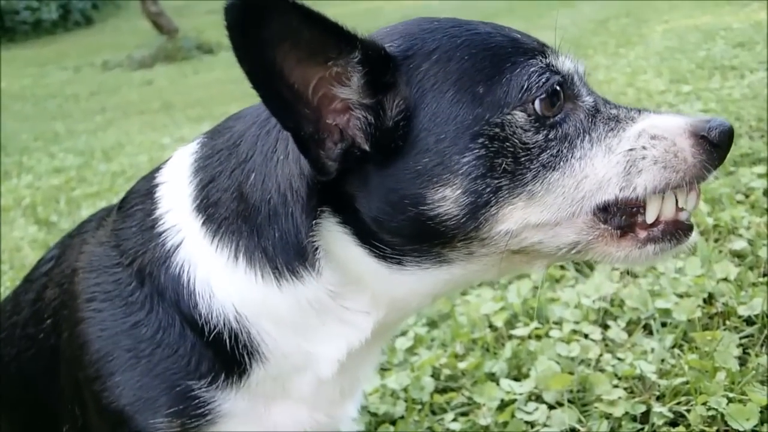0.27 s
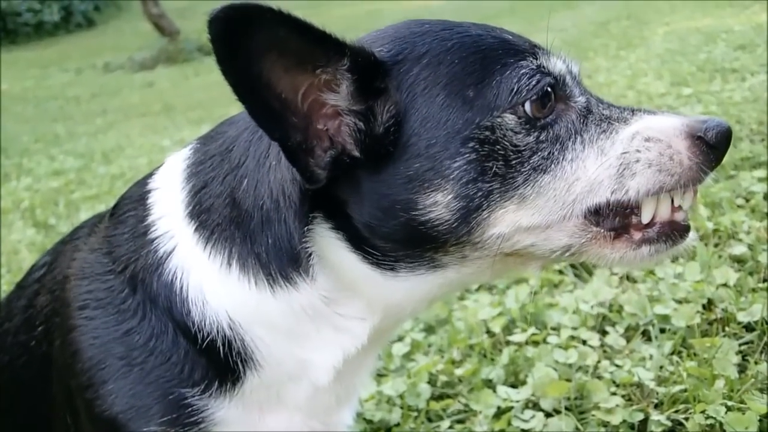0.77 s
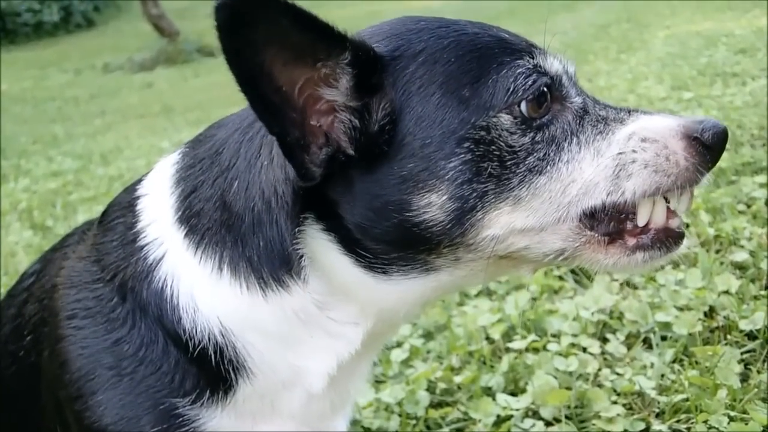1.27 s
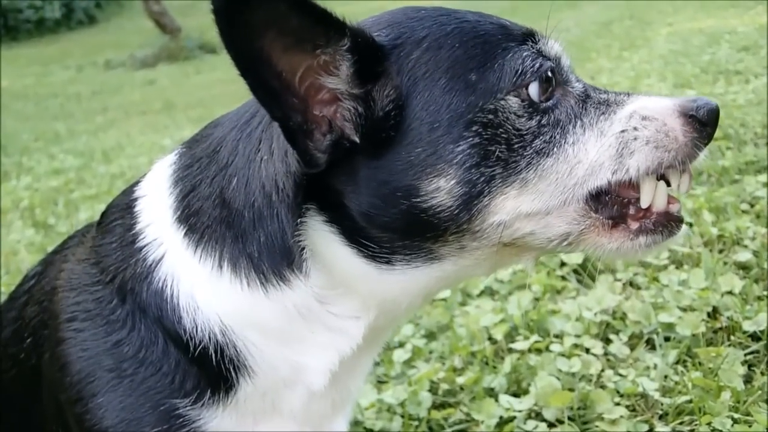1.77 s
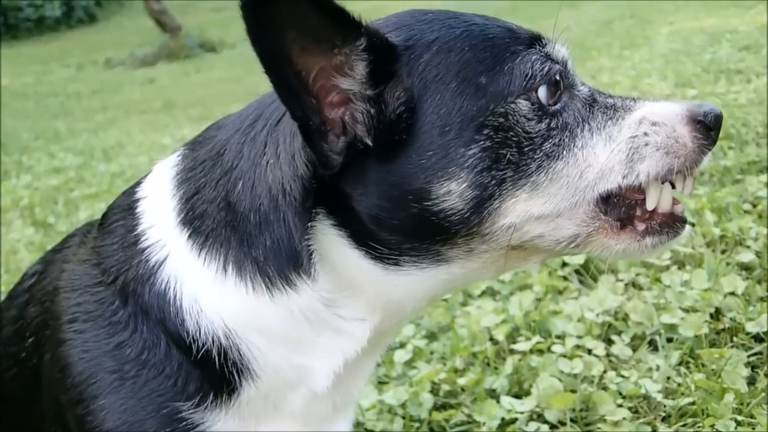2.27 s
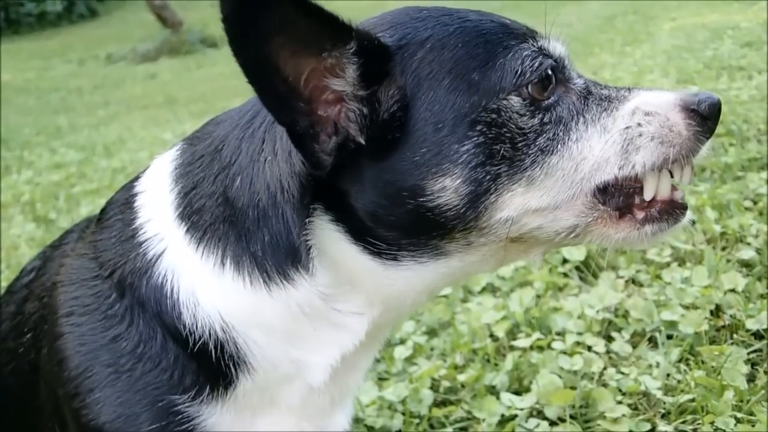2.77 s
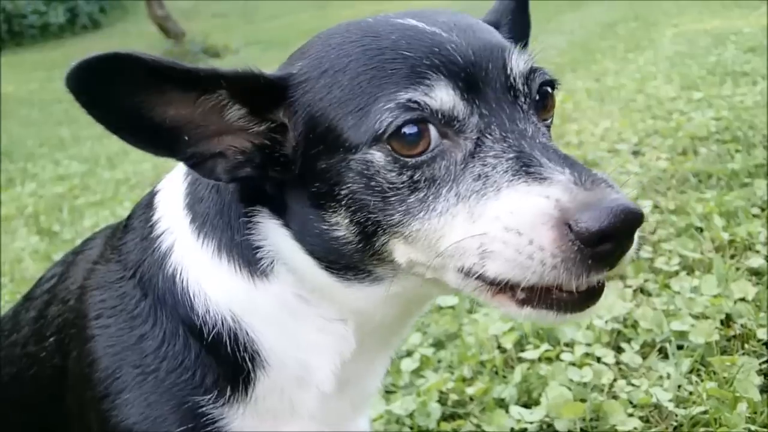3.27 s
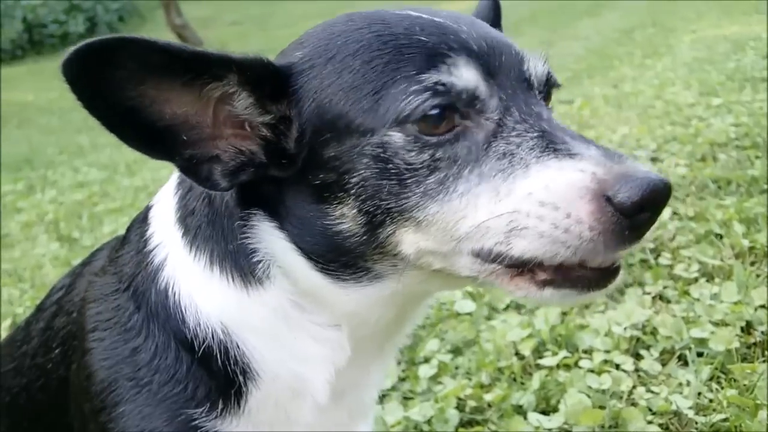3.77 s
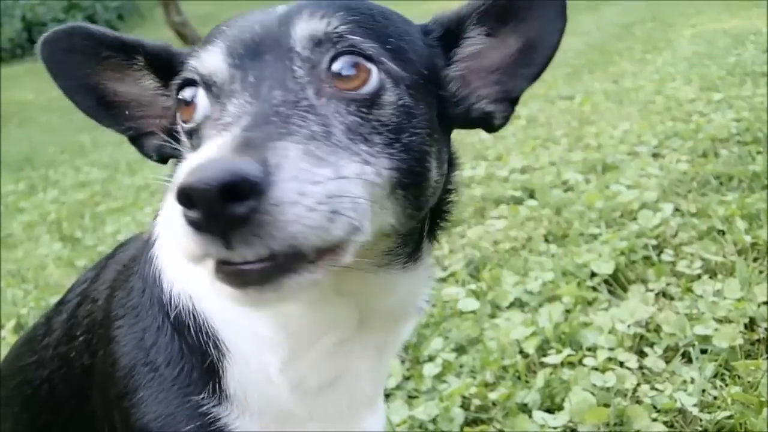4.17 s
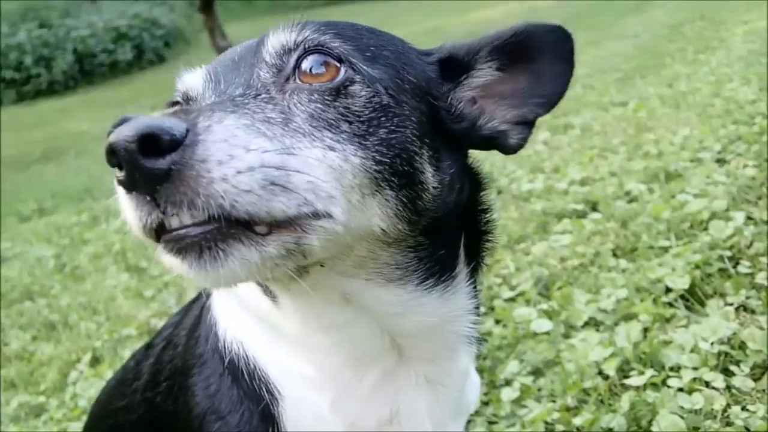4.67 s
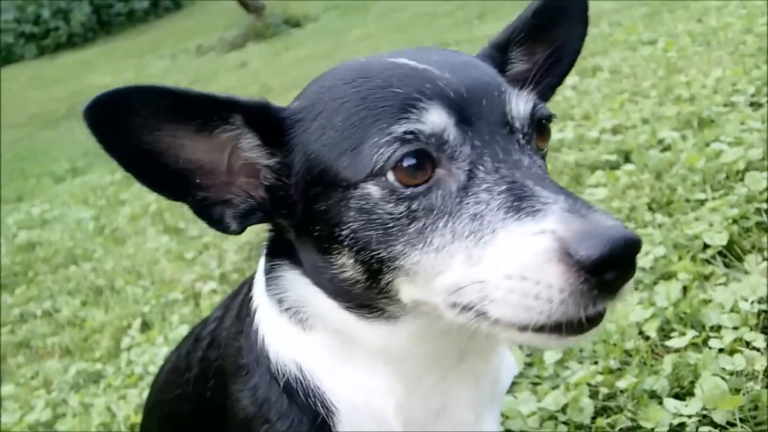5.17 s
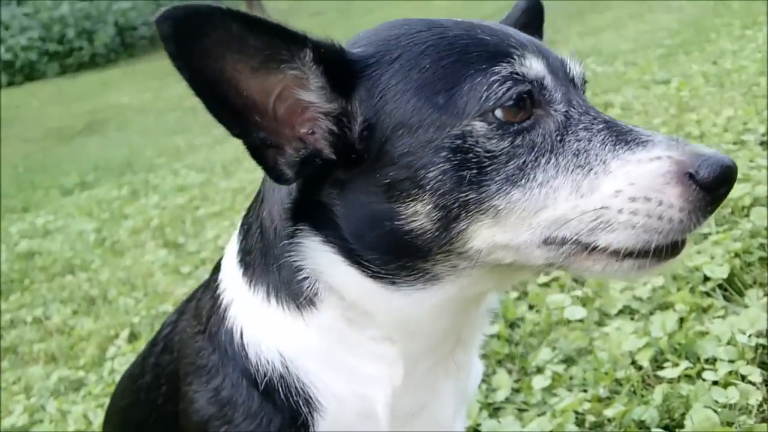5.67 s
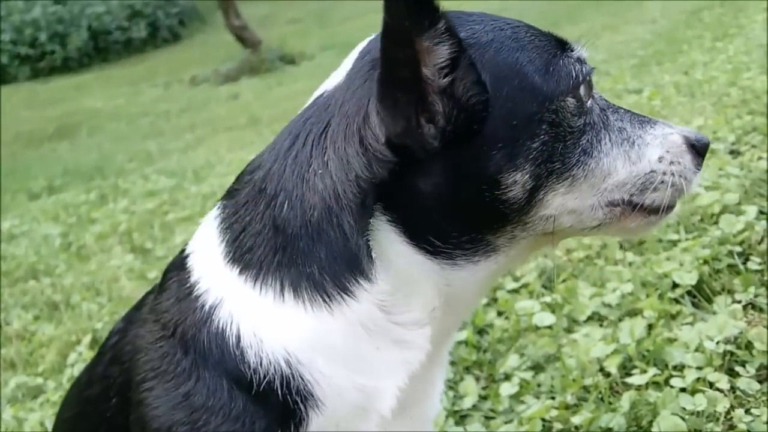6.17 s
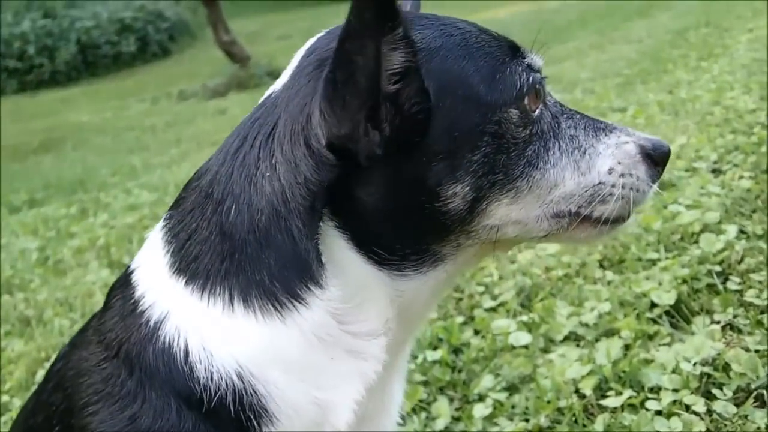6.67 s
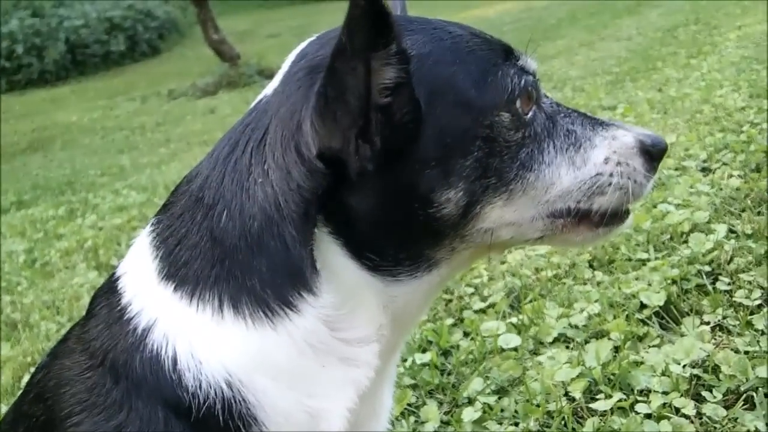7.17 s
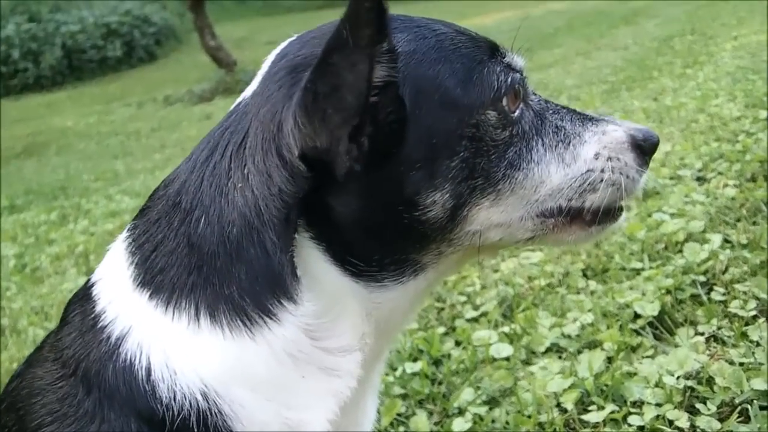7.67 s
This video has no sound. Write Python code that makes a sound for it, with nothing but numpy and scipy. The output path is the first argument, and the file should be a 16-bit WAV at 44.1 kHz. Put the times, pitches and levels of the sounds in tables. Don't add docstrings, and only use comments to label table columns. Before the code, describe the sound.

Close to a stereo microphone outdoors, a small dog bursts into a choking, raspy growl lasting about two seconds, pauses, then growls again with less rasp. Its collar tags jingle brightly as the head turns, fur and grass rustle, and the tongue snaps once. After a short grunt comes a lower, quieter growl. Crickets chirp and trill throughout over soft evening air.

```python
import sys
import numpy as np
from scipy import signal
from scipy.fft import rfft, irfft, next_fast_len
from scipy.io import wavfile
from scipy.ndimage import uniform_filter1d

SR = 44100
rng = np.random.default_rng(int(sys.argv[2]) if len(sys.argv) > 2 else 0)


def digitize_waveform(pressure):
    field = np.atleast_2d(pressure).T
    bounded = np.clip(field, -1, 1)
    quanta = np.round(bounded * 32767).astype(np.int16)
    wavfile.write(sys.argv[1], SR, quanta)


def voltage_ratio(decibels):
    exponent = np.asarray(decibels, float) / 20
    return 10 ** exponent


N = 350154
TIME = np.arange(N) / SR

HUM_HZ, HUM_START_DB, HUM_END_DB = 129.6, -59, -50
# t/s, length/s, f/Hz, width/Hz, level/dB
BIRD_NOTES = [(3.99, .04, 2000, 1500, -43), (4.38, .05, 2400, 2000, -39), (4.795, .045, 1900, 1500, -44),
              (2.53, .05, 2000, 150, -46), (2.69, .05, 1520, 200, -39)]

# f/Hz, density/dB
AIR_SPECTRUM = [(15, -48), (25, -26), (137, 2), (317, -6), (591, -8), (1560, -16), (3430, -18.5),
                (3920, -23), (4610, -8), (5570, -2.5), (6050, -8.5), (7110, -6.5), (9070, -23.5),
                (13200, -19), (16000, -28)]
AIR_DB = -38
# f/Hz, correlation [-1 to 1]
AIR_LIKENESS = [(60, 0.99), (180, 0.65), (550, 0.16), (1650, 0.2), (4970, 0.58), (15000, -0.46)]
# middle t/s, length/s, fine hiss level/dB, low body level/dB
RUSTLES = [(0.35, 0.9, -61, -70), (1.45, 0.8, -64, -70), (2.123, 0.2, -66, -44), (2.45, 2.5, -57, -51.5),
           (2.902, 0.91, -45.5, -43), (3.683, 1.36, -46, -41.5), (4.525, 0.42, -47, -39),
           (4.7, 4.1, -46, -56.5), (5.9, 1.1, -70, -78), (7.827, 0.92, -46, -57)]

# t/s, level/dB
NEAR_CHIRPS = [(.8, -38), (1.231, -35), (2.106, -37), (2.6, -38), (3.09, -39), (3.534, -38), (4.03, -37),
               (4.49, -42), (4.837, -43), (5.346, -37), (5.795, -36.5), (6.285, -35.5), (6.737, -36),
               (7.196, -36), (7.64, -39)]
SECOND_CHIRPS = [.02, .425, .83, 1.235, 1.64, 2.14, 2.455, 2.9, 3.3, 3.68, 4.07, 4.48, 4.885, 5.285, 5.695,
                 6.098, 6.535, 6.95, 7.33, 7.74]
SECOND_DB = -43
# first stroke t/s, length/s, rate/strokes per s, level/dB, f/Hz
TRILL_PHRASES = [
    (0.0193, 1.7, 41.52, -51, 7270),
    (2.354, 3.97, 41.41, -47, 7290),
    (6.8, 1.13, 41.25, -48.5, 7040),
]
TRILL_RISE_S, TRILL_FALL_S, TRILL_JITTER_S = 0.17, 0.08, 0.0009
# t/s, level/dB
TRILLER_FACING = [(0, 0), (2.3, -6), (3.1, 3.5), (4.3, 0), (5.5, 2.5), (5.9, -2), (6.8, -3), (7.9, 6.5)]
# f/Hz, width/Hz, rate/strokes per s, depth [0-1], level/dB
FAR_TRILLERS = [(4727, 174, 17, 0.32, -51.5), (5190, 1200, 16, 0, -50.5), (5577, 280, 94, 0.8, -51.5),
                (6320, 130, 38, 1, -57), (6800, 170, 74, 1, -58.5)]

# t/s, ring level/dB, buckle knock level/dB, knock f/Hz
TAG_STRIKES = [(3.7444, -24.5, -42, 4815), (3.772, -33, -39, 4800), (3.8245, -32, -37, 5213),
               (3.85, -44, -35, 5540), (3.8541, -39, -24, 5290), (4.1508, -34, -48, 6000),
               (4.167, -21, -35, 6070), (4.2235, -16, -28.5, 4650), (4.2308, -30, -28, 4840),
               (4.235, -14, -29, 6200), (4.2375, -13, -28, 6300), (4.2437, -25, -24.5, 6200),
               (4.251, -21, -28, 5600), (4.2565, -28, -37.5, 3200), (4.6004, -26, -27, 4820),
               (4.6073, -36, -30, 4970), (4.6152, -30, -31, 5200), (4.6185, -33, -29, 6400),
               (4.982, -23, -35, 5030), (5.064, -35, -32.5, 5200), (5.08, -33, -38, 5200),
               (5.1597, -31, -40, 4960), (5.4007, -37, -34, 5000), (5.8215, -39, -41, 5000),
               (6.2335, -32, -39, 5000), (6.319, -24.5, -41, 6100), (6.574, -36, -36, 4760),
               (6.59, -29, -33, 5200), (6.992, -31, -40, 4800), (7.309, -34, -47, 5000),
               (7.7066, -28, -37, 5510), (7.7377, -27, -28, 4720), (7.7447, -17, -25.5, 4950),
               (7.7613, -26, -27.5, 5570), (7.765, -29, -26, 6010)]
# f/Hz, level/dB, t60/s
TAG_MODES = [(11300, -9, .02), (12250, 1, .17), (12430, -7, .1), (13710, -8, .1), (14620, -2, .06),
             (14750, 5, .06)]
# f/Hz, width/Hz, level/dB
TAG_GLANCE = [(11200, 530, -6.5), (12240, 510, 7.5), (14800, 520, 6.5), (15200, 370, -16)]
# multiple of the knock pitch, width/Hz, level/dB
BUCKLE_MODES = [(.62, 700, -13.5), (1, 800, 5.5), (1.3, 1100, -11), (1.9, 3000, -11)]

# t/s, effort level/dB, f/Hz, mouth opening/dB
GROWL_STRETCHES = [
    [(0.097, -19.5, 110.1, 6.5), (0.13, -26.5, 110.8, 8), (0.33, -25.5, 105.2, 4), (0.72, -28, 110, -1),
     (1.17, -29, 102.8, 1.5), (1.45, -26.5, 109.2, -0.5), (1.7, -29.5, 103.9, 2), (2.03, -28, 92.9, 0.5)],
    [(2.69, -27.5, 100.2, 1.5), (2.97, -28, 103.3, -0.5), (3.03, -31.5, 109.3, -7)],
    [(3.0, -25, 111.4, -1), (3.09, -28.5, 113.8, 1.5), (3.3, -29, 106, 2), (3.63, -29, 102.4, 0),
     (3.71, -31, 97.7, 2.5), (3.887, -29.5, 93.7, 3.5), (3.96, -32, 77.6, 4)],
    [(6.085, -42.5, 72.4, -3), (6.18, -36.5, 70.1, 4), (6.29, -57, 69.6, -17)],
    [(6.44, -34, 66.6, -4), (6.48, -38, 71.3, -3), (6.52, -37, 79.6, -2), (6.565, -34.5, 83, 0),
     (6.62, -35.5, 74.3, 0), (6.69, -37, 70, -1)],
    [(6.655, -39, 76, -5), (6.73, -33.5, 82.6, -5), (6.79, -33, 80.2, -3), (6.87, -33, 87.4, 1),
     (7.1, -32.5, 87.76, 6), (7.31, -32, 88.34, 4), (7.56, -34, 85.6, 2), (7.74, -33.5, 80.7, 3),
     (7.92, -35.5, 76.4, -7)],
]
# t/s, roughness [0-1]
FOLD_ROUGHNESS = [
    [(0, .85), (.7, .72), (1, .55), (1.15, .65), (1.4, .5), (1.6, .65), (1.9, .55), (2.05, .3)],
    [(2.7, .7), (3, .65)],
    [(3, .6), (3.15, .42), (3.6, .42), (3.8, .15)],
    [(6, .6)],
    [(6.44, .5), (6.5, .22), (6.68, .35)],
    [(6.7, .3), (6.8, .62), (7.25, .58), (7.42, .08), (7.62, .1), (7.72, .2)],
]
# attack/s, release/s, then fundamental, mouth and breath level/dB against effort
STRETCH_VOICING = [
    (0.0085, 0.073, -11.5, -13, -17),
    (0.0082, 0.022, -9.5, -9, -17),
    (0.036, 0.035, -6.5, -11.5, -20),
    (0.016, 0.066, -13, -27, -37),
    (0.041, 0.037, -16, -23, -23.5),
    (0.03, 0.057, -15, -24, -29),
]
LOW_DB_PER_HZ = 0.5
# f/Hz, level/dB
CHEST_COLOURS = [
    [(76, -40.5), (130, 0), (146, 3), (209, -3), (253, -3.5), (307, -15.5), (420, -17), (517, -43.5),
     (640, -50.5), (830, -55), (1410, -120)],
    [(76, -20), (130, -0.5), (151, 2), (205, -2), (253, -3), (295, -13), (356, -11.5), (429, -19),
     (640, -32.5), (830, -72), (1410, -120)],
    [(70, -24), (120, -6), (175, 1), (260, -4), (360, -5), (440, -22), (520, -21), (640, -33.5), (830, -51),
     (1400, -100)],
]
# f/Hz, width/Hz, level/dB
MOUTH_BARED = [(698, 460, -9.5), (897, 153, 4.5), (990, 270, -5), (1184, 200, -7.5)]
# f/Hz, width/Hz, level/dB
MOUTH_HEAD_UP = [(713, 540, -9.5), (863, 143, 5), (970, 174, -4.5), (1154, 150, -9.5)]
# f/Hz, width/Hz, level/dB
MOUTH_CLOSED = [(724, 82, -3), (868, 200, 1), (1006, 240, -2.5), (1200, 190, -3.5)]
# f/Hz, width/Hz, level/dB
AIRWAY = [(1500, 190, -1.5), (2280, 720, -2.5), (2644, 310, 1), (3930, 2340, -2), (4895, 376, 11),
          (5550, 720, 6), (8760, 1700, -11.5)]
# f/Hz, width/Hz, level/dB
AIRWAY_HEAD_UP = [(1500, 240, 3.5), (2140, 460, 7), (2480, 580, 3.5), (3650, 880, -6.5), (4780, 710, 4),
                  (5650, 740, -0.5), (8000, 2200, -10)]
# t/s, level/dB
BREATH_LEAK = [(0.06, -14), (0.14, 10), (0.24, -1), (0.7, -1), (1.1, 0), (1.35, 2.5), (1.9, 2), (2.7, 0.5),
               (3.3, 1.5), (3.7, 2), (3.95, 0.5), (6.5, 5), (7.9, 3.5)]
# t/s, peak level/dB, brightness/dB, chest share
FOLD_SLAPS = [(0.055, -33, -19, 0.48), (0.070, -26.5, -4, 0.9), (0.0817, -23, -2, 0.73),
              (0.101, -26, 5, 0.69), (0.1279, -19, -0.5, 0.62), (0.135, -23.5, -5, 0.32),
              (0.167, -16, -4, 0.32), (0.176, -21, -8, .3), (0.202, -22, -8, 0.31), (0.2319, -27, 4, 0.39),
              (.251, -30, -6, 0.55), (.263, -24, -8, 0.43), (.297, -25, -8, .4), (.343, -29, -8, .4),
              (0.36, -20.5, -14, 0.31), (.413, -29, -8, 0.33), (.603, -27, -10, .4),
              (0.745, -32, -16, 0.36), (1.333, -27, -1, 0.65), (1.497, -28, -6, 0.64),
              (2.698, -36, 4, 0.47), (2.721, -21.5, 0, 0.5)]
# t/s, peak
# level/dB
NOISE_PUFFS = [(0.1096, -37), (0.169, -35), (0.199, -36), (0.246, -35), (0.2858, -32), (0.336, -33.5),
               (0.379, -34.5), (0.43, -33.5), (0.4763, -33.5), (0.519, -34), (0.56, -35), (0.6553, -36),
               (1.3414, -37.5), (2.794, -31.5), (2.831, -33.5), (2.884, -35.5), (2.929, -36.5),
               (2.968, -37.5), (3.838, -37.5), (4.2555, -43)]
PUFF_HZ, PUFF_SPREAD_HZ = 3200, 200
# t/s, peak level/dB, f/Hz, length/s
WET_CLICKS = [(2.318, -39, 1500, 0.019), (2.339, -37, 990, 0.011), (2.533, -41, 2830, 0.013),
              (4.646, -44.5, 800, 0.012), (6.37, -46, 1900, 0.013), (7.102, -43, 2520, 0.012),
              (7.915, -47.5, 2516, 0.028)]
SNAP_S, SNAP_DB, SNAP_T60_S = 4.7447, -23, 0.014
# f/Hz, width/Hz, level/dB
SNAP_HOLLOW = [(740, 340, 8), (2310, 2000, -1), (5150, 1100, 8)]

LEFT_DB = -2.15
LEFT_LAG = 1
# f/Hz, width/Hz, share
NARROW_DIPS = [(4020, 680, 1.0), (6100, 160, .6)]


def evened(x):
    return x / np.sqrt(np.mean(x ** 2) + 1e-20)


def read(points, hz):
    f, value = np.transpose(points)
    return np.interp(np.log(hz + 1), np.log(f + 1), value)


def follow(points, t):
    return np.interp(t, *np.transpose(points))


def add(mix, s, sound):
    part = mix[round(s * SR):][:len(sound)]
    part += sound[:len(part)]


def fade(t, length, attack, release):
    ramp = np.minimum(t / attack, (length - t) / release)
    return np.sin(np.pi / 2 * np.clip(ramp, 0, 1)) ** 2


def wander(length, seconds):
    size = max(int(seconds * SR), 1)
    once = uniform_filter1d(rng.standard_normal(length), size)
    return evened(uniform_filter1d(once, size))


def resonate(x, hz, width):
    r = np.exp(-np.pi * width / SR)
    pole = r * np.exp(2j * np.pi * hz / SR)
    return 2 * signal.lfilter([(1 - r) ** 2], [1, -2 * pole, pole ** 2], x).real


def band_noise(hz, width):
    return evened(resonate(rng.standard_normal(N), hz, width))


def tract(x, modes):
    out = 0
    for k, (hz, width, db) in enumerate(modes):
        out = out + (-1) ** k * voltage_ratio(db) * resonate(x, hz, width)
    return evened(out)


def coloured(x, points):
    size = 8192
    db = read(points, abs(np.fft.fftfreq(size, 1 / SR)))
    log_gain = np.log(voltage_ratio(np.maximum(db, -70)))
    taps = np.fft.ifft(np.exp(np.conj(signal.hilbert(log_gain)))).real
    return signal.oaconvolve(x, taps[:size // 2])[:len(x)]


def burst(seconds, hz, width):
    size = int(seconds * SR)
    return evened(resonate(rng.standard_normal(size), hz, width)) * np.hanning(size) / 2


def far():
    turns = np.cumsum(HUM_HZ + 2.0 * wander(N, 0.094)) / SR
    hum_db = np.linspace(HUM_START_DB, HUM_END_DB, N) + 1.1 * wander(N, 0.13)
    out = voltage_ratio(hum_db) * np.sin(2 * np.pi * turns)
    for s, seconds, hz, width, db in BIRD_NOTES:
        add(out, s, voltage_ratio(db) * burst(seconds, hz, width))
    gusts = voltage_ratio(-62.5 + 2.2 * wander(N, 0.14))
    return out + gusts * np.array([band_noise(84, 65) for _ in range(2)])


def air():
    frames, hz = N // 256 + 5, np.fft.rfftfreq(1024, 1 / SR)
    a, b, c, d, patches = rng.standard_normal((frames, 513, 5)).T
    patches = evened(uniform_filter1d(uniform_filter1d(patches, 10, 0), 12, 1))
    t = np.arange(frames) * 256 / SR
    still = voltage_ratio(read(AIR_SPECTRUM, hz))
    still = voltage_ratio(AIR_DB) * still / np.linalg.norm(still)
    power = still[:, None] ** 2

    fine = np.exp(-((hz - 12500) / 3000) ** 2 / 2)
    body = 1 / (1 + ((hz - 800) / 1800) ** 2) * (hz > 250)
    s, length, *levels_db = np.transpose(RUSTLES)
    moves = fade(t[:, None] - s + length / 2, length, length / 2, length / 2) ** 2
    for shape, db in zip((fine, body), levels_db):
        power = power + np.outer(shape ** 2 / np.sum(shape ** 2), moves @ voltage_ratio(db) ** 2)

    same = np.clip(read(AIR_LIKENESS, hz), -1, 1)[:, None]
    left = a + 1j * b
    right = same * left + np.sqrt(1 - same ** 2) * (c + 1j * d)
    z = np.array([left, right]) * np.sqrt(power) * voltage_ratio(2.24 * patches)
    return 0.57 * signal.istft(z, nperseg=1024, noverlap=768)[1][:, :N]


def stroke(hz, seconds, fall):
    t = np.arange(int(seconds * SR)) / SR
    return np.sin(2 * np.pi * hz * (t - fall * t ** 2 / (2 * seconds))) * np.hanning(len(t))


def chirpers():
    out = np.zeros(N)
    for s, db in NEAR_CHIRPS:
        for k, grow_db in enumerate((-8, -0.5, -1.5)):
            add(out, s + 0.044 * k - 0.003, voltage_ratio(db + grow_db) * stroke(5010, 0.025, 0.075))
    for s in SECOND_CHIRPS:
        for k, luck in enumerate(rng.standard_normal(size=4)):
            add(out, s + 0.041 * k, voltage_ratio(SECOND_DB + 2 * luck) * stroke(4820, 0.0265, 0.039))
    return out


def triller():
    out = np.zeros(N)
    sway = voltage_ratio(3 + 0.74 * wander(N, 0.03) + follow(TRILLER_FACING, TIME))
    for s, length, rate, db, hz in TRILL_PHRASES:
        beats = np.zeros(N)
        at = np.arange(0, length, 1 / rate)
        jittered = s + at + TRILL_JITTER_S * rng.standard_normal(len(at))
        beats[(jittered * SR).astype(int)] = voltage_ratio(db) * fade(at, length, TRILL_RISE_S, TRILL_FALL_S)
        out += signal.oaconvolve(beats * sway, stroke(hz, 0.011, 0.065))[:N]
    return out


def chorus():
    out = np.zeros((2, N))
    for hz, width, rate, depth, db in FAR_TRILLERS:
        turns = np.cumsum(rate * (1 + 0.0356 * wander(N, 0.18))) / SR
        beat = 1 + depth * np.cos(2 * np.pi * turns)
        a, b = band_noise(hz, width), band_noise(hz, width)
        level = voltage_ratio(db + 2.2 * wander(N, 0.06)) * beat
        out += level * np.array([0.67 * a + 0.5 * b, 0.56 * a - 0.5 * b])
    return out


def crickets():
    near = chirpers() + triller()
    smear = rng.standard_normal((2, 3000)) * voltage_ratio(-60 * TIME[:3000] / 0.1 - 29)
    smear[:, 0] = 1
    return signal.fftconvolve(near[None], smear, axes=1)[:, :N] + chorus()


def ring(modes, weights):
    t = TIME[:5000]
    out = np.zeros(len(t))
    for weight, (hz, db, t60) in zip(weights, modes):
        out += weight * voltage_ratio(db - 60 * t / t60) * np.sin(2 * np.pi * hz * t)
    return out


def collar():
    out, t = np.zeros(N), TIME[:5000]
    t60 = np.array([[0.012], [0.05], [0.011]])
    for s, db, knock_db, hz in TAG_STRIKES:
        scrape, graze, knock = rng.standard_normal((3, len(t))) * voltage_ratio(-60 * t / t60)
        tinkle = 0.16 * ring(TAG_MODES, 0.15 + 0.8 * rng.random(6) ** 2) * np.minimum(t / 0.003, 1)
        glance = 0.057 * tract(graze * np.minimum(t / 0.0018, 1), TAG_GLANCE)
        add(out, s, voltage_ratio(db) * (tinkle + glance + 0.24 * resonate(scrape, 13000, 7000)))
        buckle = [(k * hz, width, mode_db) for k, width, mode_db in BUCKLE_MODES]
        add(out, s, voltage_ratio(knock_db) * 0.32 * tract((knock + 6 * (t == 0))[:1500], buckle))
    return out


def noise_puffs(choke):
    out = np.zeros(N)
    pitches = PUFF_HZ + PUFF_SPREAD_HZ * rng.standard_normal(len(NOISE_PUFFS))
    for (s, db), hz in zip(NOISE_PUFFS, pitches):
        puff = burst(0.034, hz, 1100) + 0.058 * burst(0.034, 2240, 940)
        puff += 0.76 * burst(0.034, 6000, 870) + 0.25 * burst(0.034, 8940, 2000)
        add(out, s - 0.012, voltage_ratio(db) * puff)
        add(choke, s - 0.01, -0.62 * np.hanning(950))
    return out


def growl(rows, voicing, roughness, chest, jaws, airway, drain, choke):
    s, *columns = np.transpose(rows)
    t = np.arange(s[0], s[-1], 1 / SR)
    effort_db, hz, open_db = (np.interp(t, s, c) for c in columns)
    attack, release, low_db, mouth_db, breath_db = voicing
    rough = follow(roughness, t)

    drift = (0.004 + 0.1 * rough) * wander(len(t), 0.006) + 0.025 * rough * wander(len(t), 0.018)
    turns = np.cumsum(hz * (1 + drift)) / SR
    flutter = np.tanh(wander(len(t), 0.006) + 0.3 * wander(len(t), 0.02))
    force = voltage_ratio(5 * rough * flutter) * np.interp(t, TIME, choke)
    pulses = -np.diff(np.floor(turns), prepend=0) * force
    extra = -np.diff(np.floor(turns + 0.45), prepend=0) * force * rough
    gate = (0.51 + np.exp(-(turns % 1) / 0.17)) * force
    hiss = evened(gate * rng.standard_normal(len(t)))

    body = evened(coloured(evened(pulses) + 0.3 * rough * hiss, chest))
    body += 0.5 * rough ** 2 * evened(resonate(pulses + extra, 336.0, 99))
    low = np.sqrt(2) * np.cos(2 * np.pi * turns + 2.05) * uniform_filter1d(force, 400)
    buzz = evened(pulses + 0.67 * extra) * (1 - 0.7 * rough)
    mouth = tract(buzz + (0.12 + 1.05 * rough) * hiss, jaws)
    breath = tract((0.45 + 0.8 * rough) * hiss + 0.85 * evened(pulses), airway)

    voice = body + voltage_ratio(low_db + LOW_DB_PER_HZ * (hz - hz.mean())) * low
    voice += voltage_ratio(mouth_db + open_db) * mouth
    voice += voltage_ratio(breath_db + 3 + follow(BREATH_LEAK, t)) * breath
    trapped = voice - signal.lfilter(*signal.iirnotch(525, 3, SR), voice)
    voice -= drain * trapped
    return s[0], voltage_ratio(effort_db) * voice * fade(t - s[0], s[-1] - s[0], attack, release)


def growls(choke):
    out = np.zeros(N)
    bared = (CHEST_COLOURS[0], MOUTH_BARED, AIRWAY, 1)
    raised = (CHEST_COLOURS[1], MOUTH_HEAD_UP, AIRWAY_HEAD_UP, 0.1)
    shut = (CHEST_COLOURS[2], MOUTH_CLOSED, AIRWAY, 0.1)
    postures = [bared, bared, raised, shut, shut, shut]
    for *control, posture in zip(GROWL_STRETCHES, STRETCH_VOICING, FOLD_ROUGHNESS, postures):
        add(out, *growl(*control, *posture, choke))
    return out


def fold_slaps():
    out, t = np.zeros(N), TIME[:1500]
    impulse = 1.0 * (t == 0)
    mouth = tract(impulse, MOUTH_BARED)
    thump = evened(resonate(impulse, 259, 163))
    for s, db, bright_db, chest in FOLD_SLAPS:
        spit = tract(rng.standard_normal(1500) * voltage_ratio(-60 * t / 0.021), AIRWAY)
        slap = -0.2 * mouth - 0.51 * chest * thump + 0.098 * voltage_ratio(bright_db) * spit
        add(out, s, voltage_ratio(db) * slap)
    return out


def mouth_clicks():
    out, t = np.zeros(N), TIME[:1500]
    for s, db, hz, seconds in WET_CLICKS:
        click = burst(seconds, hz, 990) + 1.3 * burst(seconds, 3050, 3300)
        click += 1.45 * burst(seconds, 4950, 2200)
        add(out, s, voltage_ratio(db) * click)
    crack = (t == 0) + 0.27 * rng.standard_normal(1500) * voltage_ratio(-60 * t / SNAP_T60_S)
    add(out, SNAP_S, voltage_ratio(SNAP_DB) * 0.17 * tract(crack, SNAP_HOLLOW))
    return out


def dog():
    choke = np.ones(N)
    out = noise_puffs(choke)
    out += growls(choke) + fold_slaps() + mouth_clicks()
    out -= 0.55 * resonate(out, 1300, 106)
    return signal.sosfilt(signal.butter(4, 84, "high", fs=SR, output="sos"), out)


def ports(x, lag, bounce_db):
    size = next_fast_len(N)
    turn = np.exp(-2j * np.pi * np.fft.rfftfreq(size) * lag)
    left = irfft(rfft(x, size) * turn, size)[:N]
    blur = uniform_filter1d(rng.standard_normal((2, 1200)), size=9) * voltage_ratio(-60 * TIME[:1200] / 0.035)
    blur = np.diff(blur, n=2, prepend=[[0, 0]] * 2)
    blur /= np.linalg.norm(blur, axis=1, keepdims=True)
    return np.array([left, x]) + voltage_ratio(bounce_db) * signal.fftconvolve(x[None], blur, axes=1)[:, :N]


def scene():
    mix = far() + air() + crickets()
    mix += ports(collar(), 0.9, -11)
    mix += ports(dog(), LEFT_LAG, -4)
    return mix * voltage_ratio(np.array([[LEFT_DB], [-LEFT_DB]]))


def roll_off(x):
    return signal.sosfilt(signal.butter(12, 15840, fs=SR, output="sos"), x)


def record(dry):
    heard = dry.copy()
    for hz, width, share in NARROW_DIPS:
        heard -= share * np.array([resonate(x, hz, width) for x in dry])
    edge = signal.firwin(301, 16150, window=("kaiser", 8), fs=SR)
    return roll_off(signal.oaconvolve(heard, edge[None], "same"))


dry = scene()
out = record(dry)
digitize_waveform(out)
```